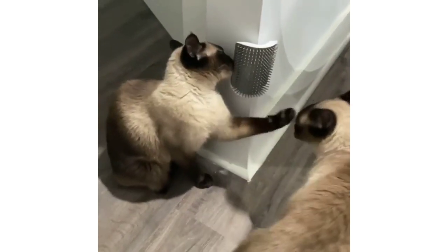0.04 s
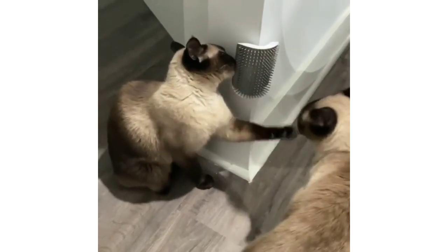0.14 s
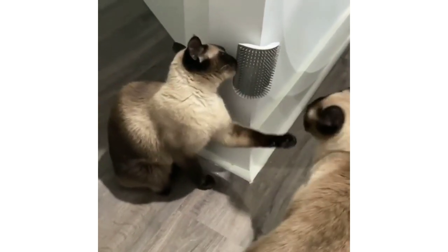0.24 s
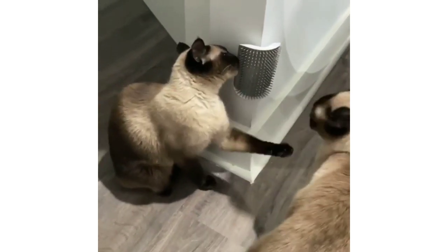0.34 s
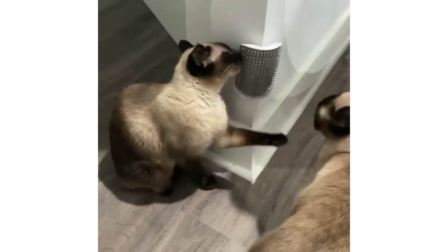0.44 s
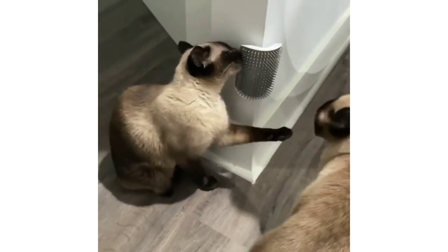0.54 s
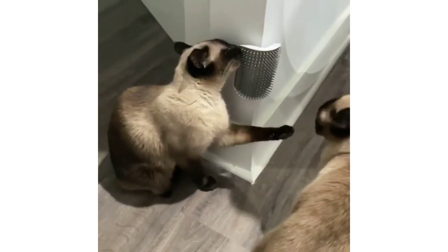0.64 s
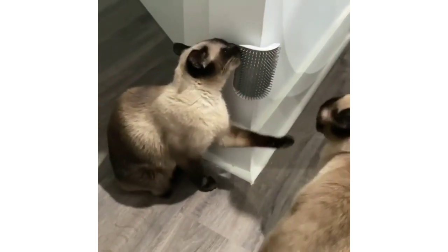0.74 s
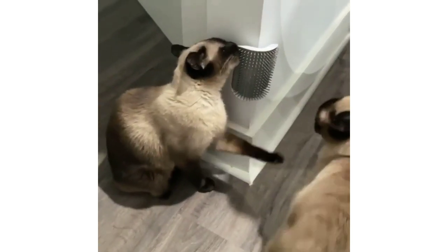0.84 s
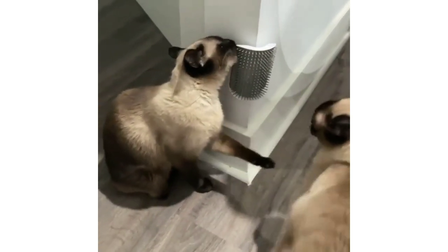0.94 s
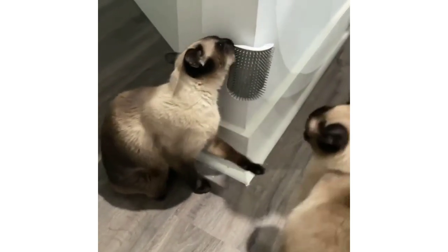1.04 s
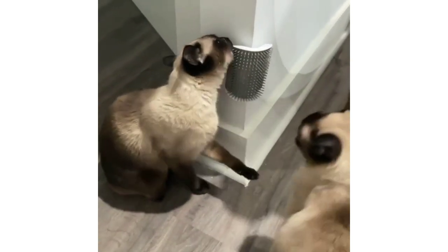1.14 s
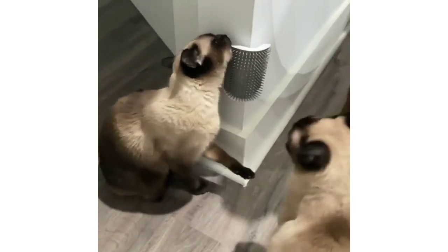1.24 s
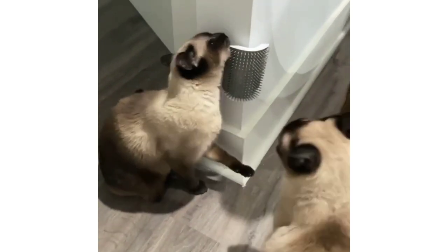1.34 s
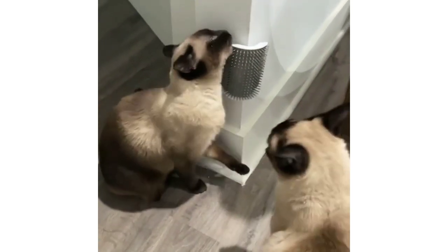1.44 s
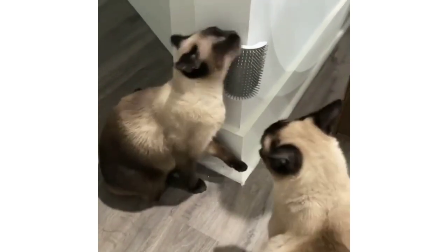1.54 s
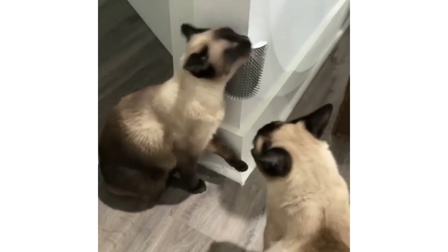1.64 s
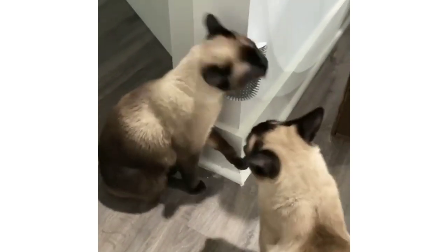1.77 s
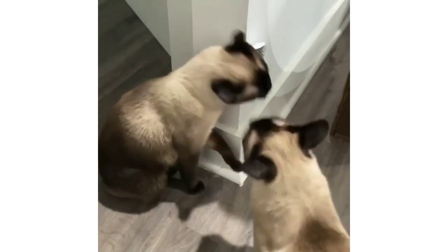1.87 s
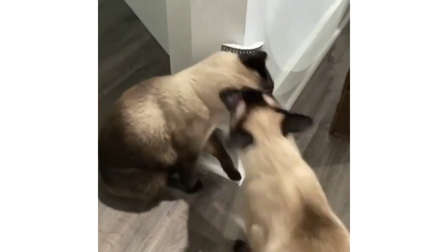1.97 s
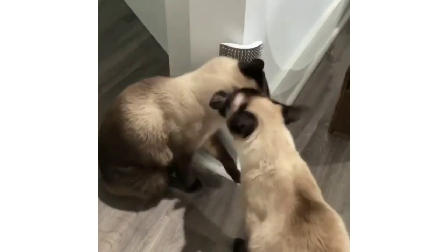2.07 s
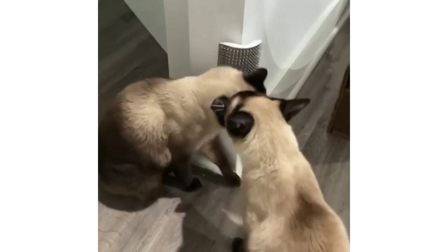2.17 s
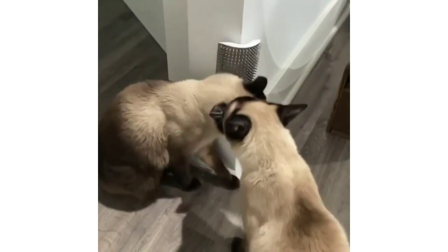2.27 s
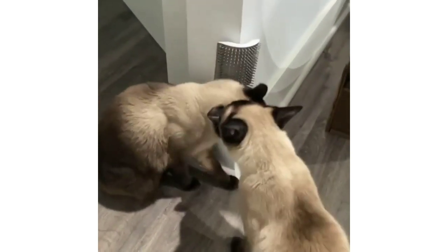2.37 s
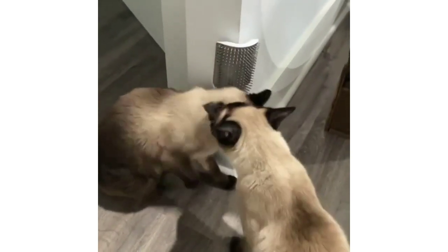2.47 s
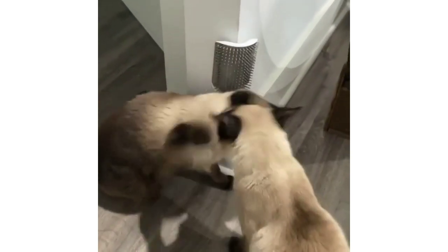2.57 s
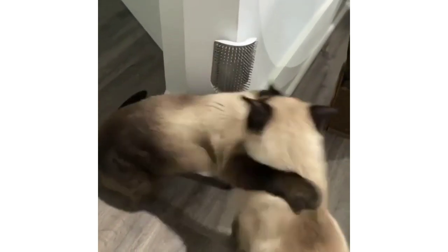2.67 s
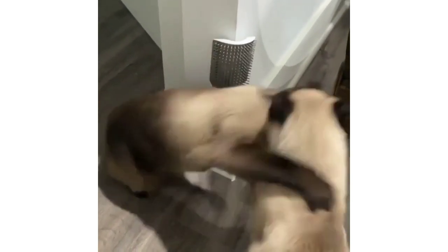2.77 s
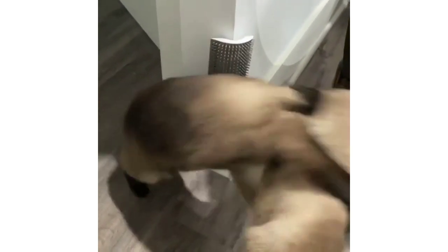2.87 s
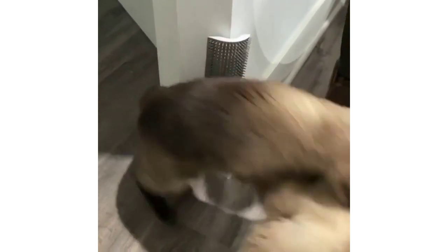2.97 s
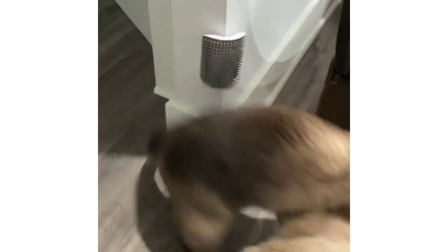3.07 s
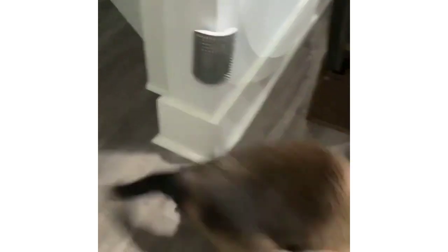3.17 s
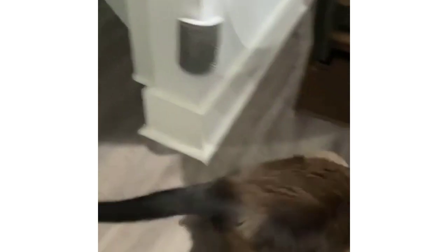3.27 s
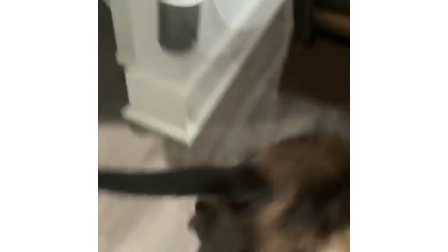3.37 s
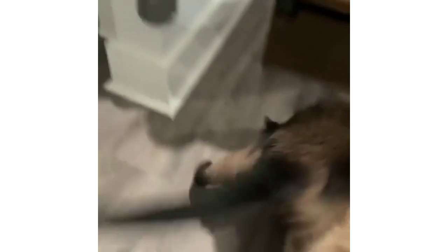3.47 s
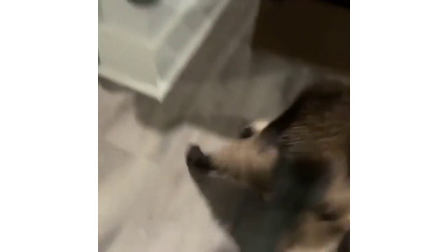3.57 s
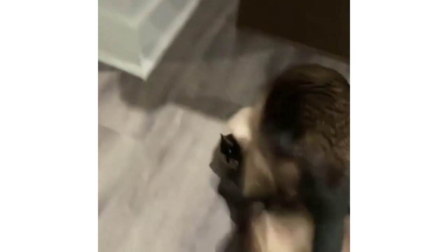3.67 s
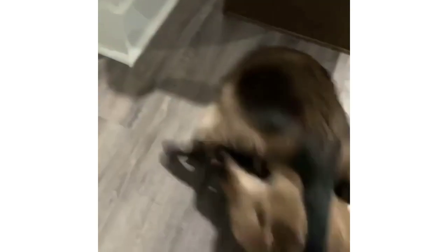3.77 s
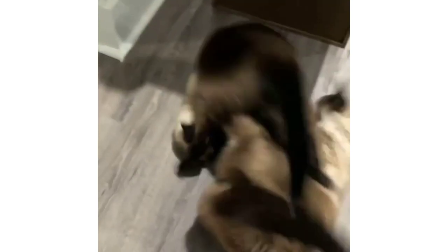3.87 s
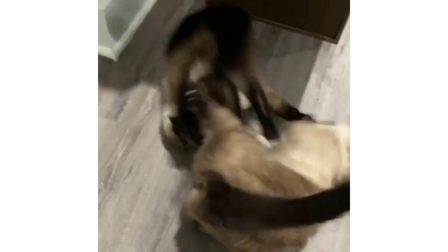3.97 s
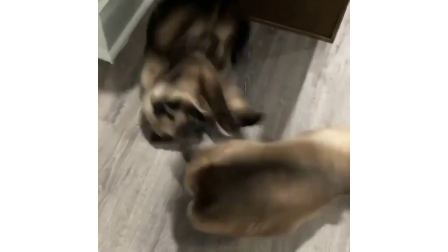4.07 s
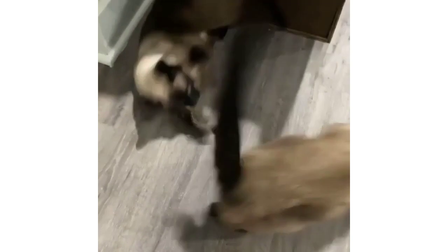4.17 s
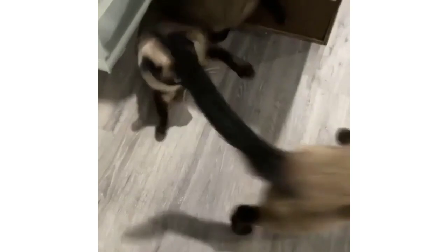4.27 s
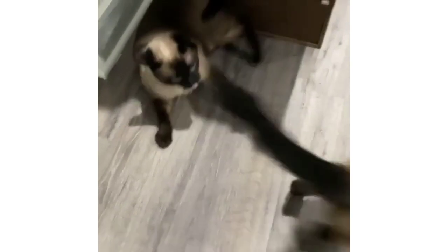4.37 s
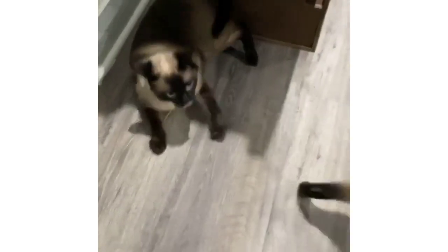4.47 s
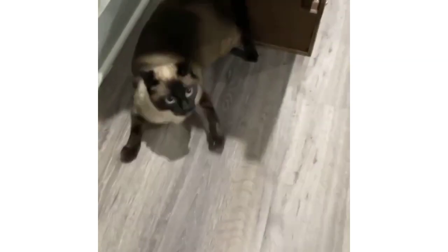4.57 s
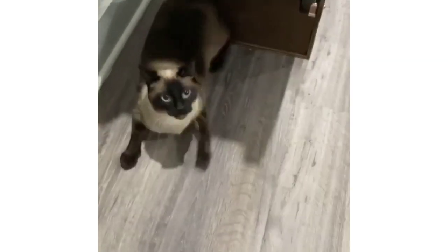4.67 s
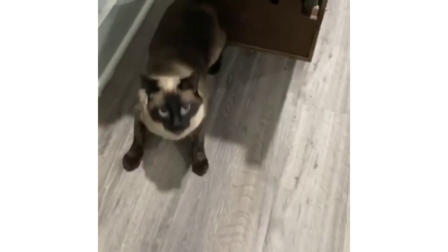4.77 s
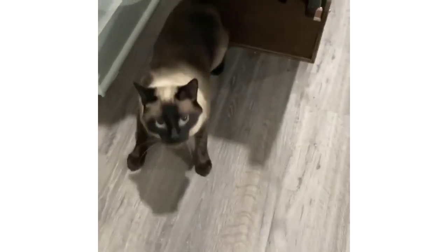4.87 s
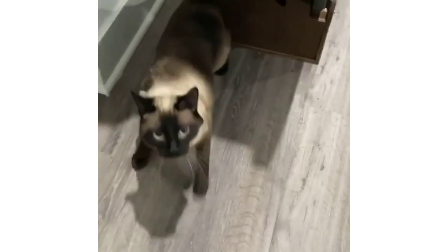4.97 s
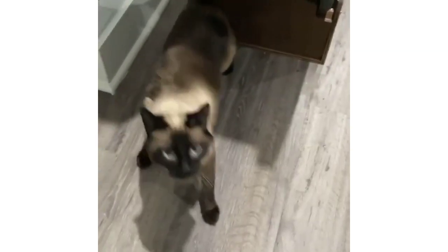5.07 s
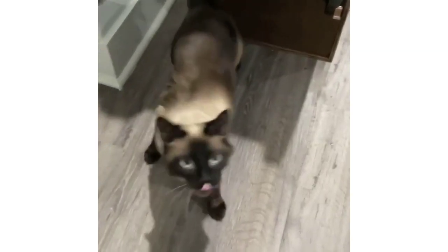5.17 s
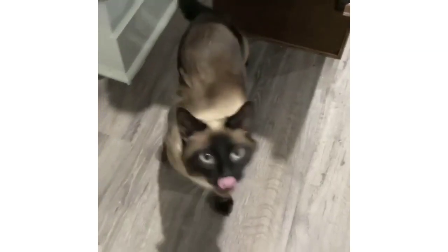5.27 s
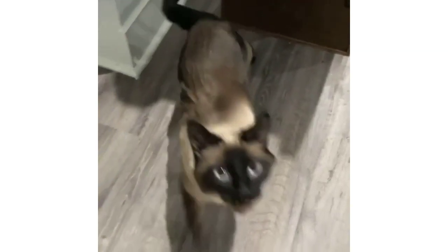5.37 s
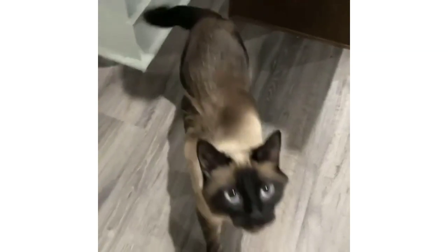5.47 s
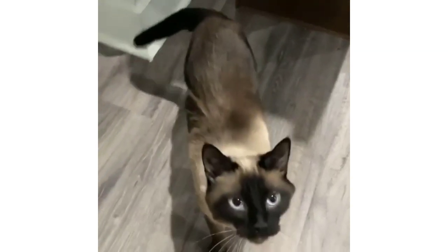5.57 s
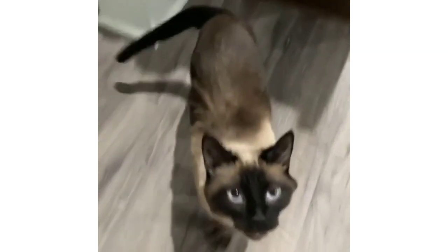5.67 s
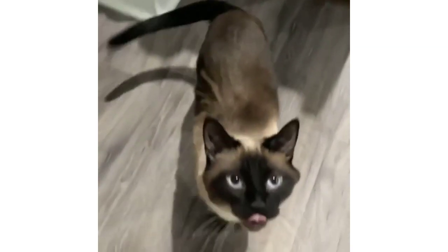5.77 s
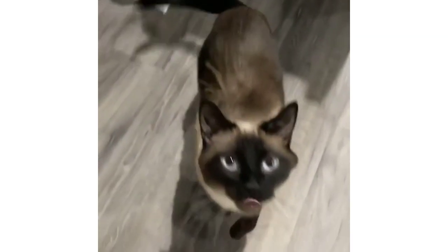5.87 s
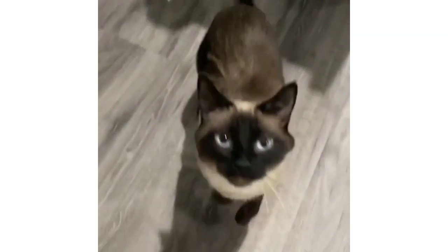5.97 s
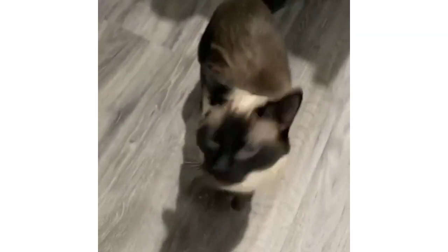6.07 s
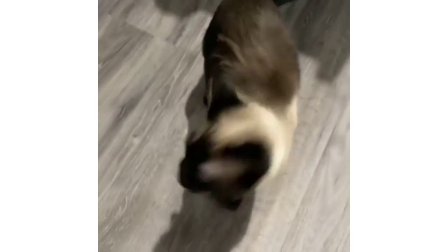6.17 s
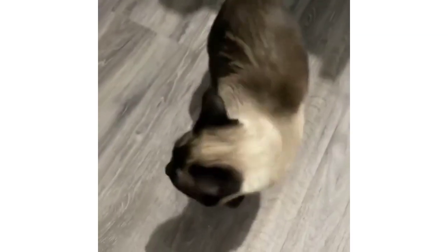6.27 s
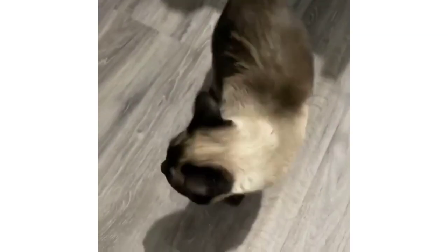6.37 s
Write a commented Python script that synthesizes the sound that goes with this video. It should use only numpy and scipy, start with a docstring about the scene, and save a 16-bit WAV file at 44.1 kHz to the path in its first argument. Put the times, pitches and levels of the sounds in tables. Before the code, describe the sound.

In a quiet room with low rumble, a few tiny claw ticks and fur swishes lead to a dry, raspy rub on a bristle brush. Two cats then wrestle on hard flooring: padded thuds, gritty skids, sharp claw clacks and fur rustles. Two hollow knocks on a wooden cabinet door are the loudest moment. A few scrambling steps fade to faint ticks. Close handheld phone pickup, short indoor echo.

```python
"""A faint house rumble comes first, soon joined by claw ticks and soft fur swishes from two cats.
One rubs its head on a bristle brush; then they wrestle on a laminate floor and knock a cabinet door twice.
Fur is uneven noise through resonances; ticks, skids and thuds are short coloured noise bursts,
and the wooden door is a set of ringing tones. Noise echoes make the room;
a phone hears it all through two close microphone ports."""
import sys
import numpy as np
from scipy import signal
from scipy.fft import rfft, irfft, next_fast_len
from scipy.io import wavfile

SR = 44100
rng = np.random.default_rng(int(sys.argv[2]) if len(sys.argv) > 2 else 0)


def output_pcm(signal):
    """Save a mono or channel-first signal as 16-bit PCM at the path in sys.argv[1].

    Samples are clipped to [-1, 1] before scaling.
    """
    pcm = np.clip(np.atleast_2d(signal).T, -1, 1) * 32767
    wavfile.write(sys.argv[1], SR, np.round(pcm).astype(np.int16))


N = 282668

# The head pushed along the bristles, as points in time:
# start_s, level_db, treble_db (treble compared with the level)
RUB = [(1.3, -82, -5.5), (1.44, -80, 1), (1.5, -74, -1), (1.57, -67.5, -9), (1.65, -65, -6.5),
       (1.75, -63.5, -9), (1.87, -60, -9), (2.07, -64.5, -9.5), (2.15, -66, -5), (2.37, -68.5, -5.5),
       (2.47, -67, -9.5), (2.6, -80.5, -13), (2.7, -100, -12)]

# The left port is a centimetre nearer, so it hears sound earlier (negative lag).
# The lag fades above LAG_FADE_HZ, as treble wraps round the case.
LEFT_LAG_S, LAG_FADE_HZ = -.000035, 3000


def from_db(db):
    """Turn decibels into a gain."""
    return 10 ** (np.asarray(db) / 20)


def rms_one(x):
    """Scale a sound to an average (rms) strength of 1."""
    return x / np.sqrt(np.mean(x ** 2) + 1e-20)


def at_hz(points, hz):
    """Read a table between its points, with pitch spaced by octaves."""
    table_hz, values = np.array(points).T
    return np.interp(np.log(hz), np.log(table_hz), values)


def band(x, low_hz, high_hz):
    """Keep only the pitches between two limits (Butterworth filter)."""
    sos = signal.butter(2, [low_hz, min(high_hz, .45 * SR)], "band", fs=SR, output="sos")
    return signal.sosfilt(sos, x)


def low_pass(x, cut_hz):
    """Gently soften everything above a pitch."""
    return signal.lfilter(*signal.butter(1, cut_hz, fs=SR), x)


def ring(x, hz, width_hz):
    """A resonance with two poles: a unit click rings at hz; a narrow width rings longer."""
    r, w = np.exp(-np.pi * width_hz / SR), 2 * np.pi * hz / SR
    return signal.lfilter([0, np.sin(w)], [1, -2 * r * np.cos(w), r * r], x)


def drift(rate_hz):
    """A slow random wander of spread 1; a higher rate wanders faster."""
    r = np.exp(-80 * np.pi * rate_hz / SR)  # computed at one point per 40 samples
    slow = signal.lfilter([1], [1, -2 * r, r * r], rng.standard_normal(N // 40 + 2002))
    slow = rms_one(slow[2000:])  # skip the filter's start
    return np.interp(np.arange(N) / 40, np.arange(len(slow)), slow)


def ports(mid, side):
    """Mix two unrelated signals into left and right, as alike as the ports are at each pitch."""
    # How alike the ports hear sound from all around: pitch_hz, likeness (-1 opposite to 1 same)
    likeness = [(60, 0.97), (125, 0.9), (250, 0.81), (1000, 0.0063), (3000, 0.36), (6000, 0.098),
                (8700, -0.58), (10300, -0.38), (12000, 0.28)]
    size = next_fast_len(N)
    hz = np.fft.rfftfreq(size, 1 / SR)
    alike = np.clip(at_hz(likeness, np.maximum(hz, 1)), -1, 1)
    mid = rfft(mid, size) * np.sqrt(1 + alike)
    side = rfft(side, size) * np.sqrt(1 - alike)
    lag_s = LEFT_LAG_S / (1 + (hz / LAG_FADE_HZ) ** 2)
    left = (mid + side) * np.exp(-2j * np.pi * hz * lag_s)
    return irfft(np.array([left, mid - side]), size)[:, :N]


def add(out, sound, s):
    """Mix a short sound in at a time in seconds."""
    i = round(s * SR)
    out[..., i:i + sound.shape[-1]] += sound[..., :N - i]


def house():
    """Steady rumble and hiss: noise in third-octave bands, each wavering a little in level."""
    # Colour of the house noise: pitch_hz, density_db (relative, per Hz)
    house_colour = [(12, -53), (20, -33.5), (41, -5.5), (66, -2.5), (124, -5.5), (146, -15.5), (252, -15),
                    (281, -18.5), (513, -25.5), (837, -38.5), (2170, -46), (6830, -56.5), (8040, -55.5),
                    (12400, -61), (13500, -65)]
    out = 0
    edges_hz = 20 * 2 ** np.arange(0, 9.7, 1 / 3)
    white = rng.standard_normal((2, 2, N))
    for k, (low, high) in enumerate(zip(edges_hz, edges_hz[1:])):
        level_db = at_hz(house_colour, np.sqrt(low * high)) + 1.6 * drift(5)
        out = out + from_db(level_db) * band(white[k % 2], low, high)
    return from_db(-57) * rms_one(ports(*out))


def room(x):
    """Echoes as fading noise, different at the two ports; treble fades twice as fast."""
    t60_s, room_db, wall_cut_hz = 0.56, -8, 1630  # t60: time to fade by 60 dB
    t = np.arange(30000) / SR
    fade = from_db(-60 * t / t60_s)
    echoes = rng.standard_normal((2, len(t))) * np.clip(t / 0.009, 0, 1) * fade
    dull = low_pass(echoes, wall_cut_hz)
    echoes = dull + (echoes - dull) * fade
    echoes = signal.sosfilt(signal.butter(2, 140, "high", fs=SR, output="sos"), echoes)
    # Scale by the energy of the dull part
    echoes /= np.sqrt(np.sum(dull[0] ** 2) * SR / 2 / wall_cut_hz / 1.52)
    mid, side = signal.fftconvolve(echoes, x[None], axes=1)[:, :N]
    return from_db(room_db) * (mid + band(side, 220, 16000) * [[1], [-1]])


def fur_levels(t):
    """Gains of the fur's body and treble: stirring, rub and swishes add up in power."""
    # Short swishes of fur, on the bristles at first and later on the floor:
    # peak_s, peak_db, swell_s and fade_s (time per 20 dB, treated as at least 0.005 s),
    # treble_db (compared with the body)
    swishes = [(0.45, -85.5, 0.33, 0.3, 2), (0.615, -78, 0.32, 0.15, -24), (0.72, -82, -0.7, 0.14, -20),
               (0.82, -74.5, 0.02, 0.4, -3), (0.948, -73.5, 0.02, 0.3, -13.5),
               (1.05, -68.5, 0.01, 0.08, -2), (1.129, -72.5, 0.06, 0, -12), (1.188, -66.5, 0.04, 0.07, -6),
               (2.8, -74, 0.14, 0.25, -4), (3.001, -60, 0, 0.12, -17), (3.088, -61.5, 0.06, 0.13, -9.5),
               (3.164, -70.5, 0.01, 0.05, 11.5), (3.215, -71, 0.08, 0.04, 9.5),
               (3.246, -53, 0.005, 0.16, -15), (3.329, -60.5, 0.22, 0.17, -3.5),
               (3.443, -71.5, -0.05, -0.05, 8.5), (3.547, -76, -0.8, -1.5, -10),
               (3.709, -56.5, 0.17, 0.35, -5), (3.79, -85, 0.2, -7, 1), (3.863, -52, -0.1251, 0.0536, -7.5),
               (3.919, -55.5, 0.07, 0.21, -31), (3.988, -71, -0.26, 0.16, 7), (4.116, -66.5, 0, 0.14, -1),
               (4.3, -71.5, 1.9, 0.01, -25), (4.367, -56, 0.05, -0.0156, -9), (4.42, -77.5, -1.8, 0.25, 5),
               (4.493, -60, 0.07, 0.0435, -7.5), (4.57, -81, 0, 0.2, -5), (4.596, -65, 0.1, -0.02, -10),
               (4.612, -60.5, 0.1, 0.0053, -22), (4.65, -70, 0.7, 0.09, -13), (4.72, -83, 0.03, 0.12, 8),
               (4.829, -90.5, -0.4, 0.5, 8), (5.16, -88.5, 0.55, 0.1, 2.5), (5.285, -84, 0.4, 0, -13),
               (5.701, -84.5, 0.2, 0.4, -20.5), (6.12, -84.5, 0.34, 0.27, -2.5)]
    stir_db, stir_treble_db = -93, -0.5  # faint steady stirring; treble compared with it
    rub_s, rub_db, rub_treble_db = np.transpose(RUB)
    rub_db = np.interp(t, rub_s, rub_db, left=-200, right=-200)
    rub_treble_db = np.interp(t, rub_s, rub_treble_db)
    # Doubled decibels give power
    body = from_db(2 * stir_db) + from_db(2 * rub_db)
    treble = from_db(2 * (stir_db + stir_treble_db)) + from_db(2 * (rub_db + rub_treble_db))
    for s, db, swell_s, fade_s, treble_db in swishes:
        before, after = (s - t) / max(swell_s, .005), (t - s) / max(fade_s, .005)
        power = from_db(2 * (db - 20 * np.where(t < s, before, after)))
        body = body + power
        treble = treble + power * from_db(2 * treble_db)
    return np.sqrt(body), np.sqrt(treble)


def resonate(grains, hz, width_hz, db, waver_db):
    """Grains through one resonance whose level wavers."""
    return from_db(db + waver_db * drift(13.0)) * rms_one(ring(grains, hz, width_hz))


def fur():
    """Countless hairs slip: uneven noise grains excite resonances, with fine sizzle and claw grit."""
    # Bristle resonances: pitch_hz, width_hz, level_db, gain (extra dB per dB of rub)
    bristles = [(915, 150, -4, 1), (1084, 73, -3, 0.3), (1285, 108.5, -2.5, -0.1), (1720, 297, -4, 0.6),
                (2042, 260, -1, 0.02), (2600, 400, -0.5, 0.06), (3280, 220, -4, 0.3),
                (3700, 430, -4.5, 0.05), (4550, 1800, -4.5, -0.04), (6800, 4100, -11, -0.2)]
    # Resonances of fur and pads on the floor: pitch_hz, width_hz, level_db
    floor_tones = [(620, 500, -4), (960, 700, 5), (1440, 370, 1.5), (1615, 140, -1), (2000, 500, 0),
                   (2660, 680, -1.5), (3400, 660, -2.5), (4400, 1800, -4), (6300, 1800, -9)]
    wrestle_s = 2.62  # the cats leave the brush for the floor
    firm_rub_db = -65  # rub level at which the bristles have their listed strength
    t = np.arange(N) / SR
    body_gain, treble_gain = fur_levels(t)
    wrestling = t > wrestle_s
    grain_db = 2.2 * rng.standard_normal(N) + np.where(wrestling, 2.2, 1.1) * drift(40)
    grains = rms_one(rng.standard_normal((2, N)) * from_db(grain_db))
    # Grit under the claws: about 260 random clicks a second while wrestling
    clicks = rng.random(N) < 260 / SR
    scratches = clicks * from_db(10.5 + 3.2 * rng.standard_normal(N)) * wrestling
    grains = grains + scratches * [[1], [.6]]

    rub_s, rub_db, _ = np.transpose(RUB)
    press_db = np.interp(t, rub_s, rub_db).clip(-72, 0) - firm_rub_db
    brush, floor = 0, 0
    # Every other resonance is turned upside down
    for k, (hz, width_hz, db, gain) in enumerate(bristles):
        brush = brush + resonate(grains, hz, width_hz, db + gain * press_db, waver_db=1.0) * (-1) ** k
    for k, (hz, width_hz, db) in enumerate(floor_tones):
        floor = floor + resonate(grains, hz, width_hz, db, waver_db=2.56) * (-1) ** k
    body = np.where(wrestling, from_db(3.5) * rms_one(floor), rms_one(brush))
    body = rms_one(band(body, 540, 9000))

    # The sizzle swaps the two grain signals
    sizzle = rms_one(signal.lfilter(*signal.butter(1, 6000, "high", fs=SR), grains[::-1]))
    treble = from_db(1.8 * drift(6.4) + 2.3 * drift(30) * wrestling) * sizzle
    return ports(*(body_gain * body + treble_gain * treble))


def contact(noise, hz, octaves, rise_s, length_s):
    """One touch: grit swells to a snap and dies away, coloured around its centre; peak 1."""
    grit_power = .6  # how uneven the grains are
    snap, snap_s = 7.0, .008  # snap height for a touch of this length; shorter ones snap harder
    t = np.arange(len(noise)) / SR
    swell = (t / max(rise_s, .0001)).clip(0, 1)
    fade = np.exp(-(t - rise_s).clip(0) / max(length_s, .0002))
    grit = noise * np.abs(noise[::-1]) ** grit_power * swell * fade
    grit[round(max(rise_s, 0) * SR)] += snap * np.sqrt(snap_s / max(length_s, .001))
    spread = 2 ** max(octaves, .05)
    low_hz, high_hz = hz / spread, hz * spread
    touch = band(band(grit, low_hz, high_hz), low_hz / 1.6, high_hz * 1.6)
    return touch / np.abs(touch).max()


def soft_thuds():
    """Padded feet, flanks and the settling door give dull, short thuds of filtered noise."""
    # Soft thuds: start_s, peak_db, pitch_hz (centre), length_s (fade of the push)
    thuds = [(0.574, -51, 237, 0.0039), (1.609, -54, 363, 0.008), (2.111, -47, 122, 0.01),
             (2.676, -46, 209, 0.013), (2.926, -41.5, 346, 0.028), (2.95, -44.5, 145, 0.025),
             (2.994, -47.5, 150, 0.055), (3.076, -40, 238, 0.0074), (3.105, -42.5, 193, 0.0038),
             (3.195, -30.5, 430, 0.014), (3.216, -35.5, 172, 0.01), (3.238, -29.5, 323, 0.0026),
             (3.298, -42, 325, 0.0058), (3.192, -34.5, 128, 0.019), (3.433, -45, 153, 0.008),
             (3.485, -42.5, 168, 0.0078), (3.577, -43.5, 172, 0.0073), (3.654, -45, 520, 0.01),
             (3.67, -37.5, 530, 0.017), (3.693, -46.5, 480, 0.008), (3.702, -37.5, 387, 0.0067),
             (3.713, -44.5, 440, 0.0019), (3.746, -48.5, 484, 0.0035), (3.793, -45.5, 192, 0.05),
             (3.814, -41.5, 163, 0.013), (4.279, -43, 355, 0.013), (4.297, -33.5, 188, 0.013),
             (4.385, -42.5, 190, 0.039), (4.44, -49, 301, 0.011), (4.468, -44.5, 221, 0.0091),
             (4.647, -46, 175, 0.053), (4.986, -47.5, 190.4, 0.0077)]
    out, noise = np.zeros(N), rng.standard_normal((len(thuds), 7000))
    for (s, db, hz, length_s), grit in zip(thuds, noise):
        add(out, from_db(db) * contact(grit, hz, 0.59, 0.00359, length_s), s)
    return out


def ticks_and_skids():
    """Claws, pads, a rattling door and late brushes: coloured grit plus a crack around 7 kHz."""
    # Short touches: snap_s, level_db (main colour's peak), pitch_hz (centre), width_octaves (each way),
    # length_s (fade of the touch), crack_db (compared with the main colour)
    touches = [(0.439, -61, 1210, 1.3, 0.005, -4), (0.45, -70, 3650, .15, 0.01, -13),
               (0.528, -67.5, 3070, 0.16, 0.0043, -14), (0.59, -67, 1310, 0.31, 0.018, -14),
               (1.048, -61.5, 1190, 0.71, 0.021, -17), (1.185, -69.5, 2790, 0.16, 0.02, -13),
               (1.483, -59, 1930, 0.76, 0.02, -14), (1.986, -45, 1910, 0.46, 0.00051, -11),
               (2.039, -51, 1010, 0.73, 0.0023, -19), (2.672, -44.5, 628, 1.25, 0.0034, -22),
               (2.781, -55.5, 3430, 0.75, 0.0036, -1), (2.798, -53, 2580, 0.65, 0.011, -14.5),
               (2.923, -57, 890, 0.61, 0.0096, -23), (2.992, -47, 1800, 1, 0.008, -11),
               (2.995, -52, 2410, 0.16, 0.008, -18), (3.05, -53, 1340, 0.093, 0.018, -34),
               (3.069, -38.5, 556, 0.21, 0.0021, -22), (3.081, -55, 1850, 0.18, 0.0015, -16),
               (3.197, -29.5, 490, 0.6, 0.0024, -43), (3.2004, -21.5, 875, .32, 0.0026, -38),
               (3.209, -37.5, 1016, 0.93, 0.02, -23), (3.253, -40, 796, 1.3, 0.015, -18.5),
               (3.24, -24.5, 748, 1.56, 0.0032, -9.5), (3.537, -51.5, 730, 0.38, 0.0056, -5),
               (3.662, -44.5, 1424, 0.99, 0.0053, -10.5), (3.672, -52, 1200, 0.92, 0.0035, -9),
               (3.689, -44, 1000, 0.98, 0.0011, -16.5), (3.716, -41, 1550, 1.1, 0.0015, 4.5),
               (3.859, -31.5, 2000, 0.28, 0.007, -29.5), (3.86, -42.5, 4000, 0.37, .006, -19),
               (3.864, -35, 1502, 0.5, 0.0036, -23.5), (3.869, -36, 2200, 0.31, 0.0043, -23.5),
               (3.887, -50, 3200, 0.56, .004, -15), (3.932, -53.5, 2490, 0.27, .006, -22),
               (3.88, -43.5, 2200, 0.62, .006, -11.5), (3.903, -25.5, 896, 0.35, 0.0024, -31),
               (3.9033, -22.5, 1430, 0.2, 0.0019, -31.5), (3.904, -37, 2400, 0.082, 0.0044, -20.5),
               (3.902, -41, 3380, 0.14, 0.0015, -19.5), (3.914, -40.5, 1480, 0.26, .006, -31.5),
               (3.918, -47.5, 3300, 0.15, 0.0032, -20), (3.944, -47, 1450, 0.16, .004, -29.5),
               (4.006, -49.5, 1500, 0.2, .003, -30), (4.009, -47.5, 1650, 0.14, 0.0053, -30),
               (3.954, -44, 1520, 0.16, 0.0099, -27.5), (3.9617, -26.5, 1393, 0.45, 0.0022, -35.5),
               (3.978, -48, 1880, 0.13, 0.0015, -30), (4.116, -40.5, 700, 1.0, 0.0038, -6.5),
               (4.22, -38, 3220, 0.31, 0.0016, -22.5), (4.226, -43.5, 2400, 0.15, 0.034, -42),
               (4.362, -58, 4700, 0.16, 0.001, -13), (4.369, -43.5, 2470, 0.16, 0.0021, -4.5),
               (4.368, -48, 4800, 0.19, 0.0032, -11), (4.564, -59, 3480, 0.19, 0.034, -8),
               (4.595, -47, 3280, 0.49, 0.015, -20), (4.674, -59, 7300, 0.37, 0.0024, -7),
               (4.988, -57, 560, 0.52, 0.004, -25), (5.158, -71.5, 4200, 0.33, 0.021, -9.5),
               (5.282, -67, 2040, 0.38, 0.009, -13), (5.438, -64, 806, 0.8, 0.0024, -19.5),
               (5.692, -61, 1884, 0.63, 0.0088, -11), (5.929, -71.5, 2100, 0.081, 0.012, -32),
               (6.04, -74.5, 2300, 0.15, 0.008, -31), (6.378, -64, 900, 0.71, 0.0027, -14)]
    out, noise = np.zeros(N), rng.standard_normal((len(touches), 4000))
    for (s, db, hz, octaves, length_s, crack_db), grit in zip(touches, noise):
        rise_s = .2 * length_s + 1.2 / hz  # a share of the length plus some cycles of its colour
        main = contact(grit, hz, octaves, rise_s, length_s)
        crack = contact(grit, 7000, 1.0, rise_s, length_s)
        add(out, from_db(db) * (main + from_db(crack_db) * crack), s - rise_s)
    return out


def door_mode(push, hz, t60_s, k):
    """One panel tone swells under the soft push and dies unevenly; low ones start sharp and settle."""
    panel_hz, swell_cycles, uneven_db = 200, 0.763, 3  # tones below panel_hz swing together
    sag_share, sag_s = .3, 0.016  # the struck panel is taut at first: starting sharpness, settling time
    t = np.arange(len(push)) / SR
    mode = ring(push, hz, np.log(1000) / np.pi / t60_s)
    if hz < panel_hz:
        # Reading ahead ever more slowly makes the pitch fall
        mode = np.interp(t + sag_share * sag_s * (1 - np.exp(-t / sag_s)), t, mode)
    else:
        mode = mode * (-1) ** k
    swell = 1 - np.exp(-t * hz / swell_cycles)
    return mode * swell * from_db(uneven_db * drift(44)[:len(t)])


def door():
    """A padded knock rings all panel tones, weighted by the spot; its first cycles fill the room."""
    # Knocks on the cabinet door: start_s, peak_db
    door_knocks = [(4.1435, -19), (4.2205, -13)]
    # Panel tones: pitch_hz, t60_s (fade by 60 dB), low_db (struck low), edge_db (struck near the edge)
    panel_tones = [(112, 0.23, -14, -12.5), (149.5, 0.16, 0, 0.5), (189.6, 0.45, -17, -15.5),
                   (245, 0.14, -14, -4.5), (358.5, 0.062, -12.5, -1.5), (397, 0.064, -29, -18),
                   (427, 0.11, -12, -17.5), (568, 0.025, -7, -1), (709, 0.074, -10, -13),
                   (869, 0.031, -7.5, -9.5), (945.7, 0.093, -15.5, -3), (952, 0.07, -9, -14),
                   (1130, 0.01, -2.5, -15.5), (1450, 0.025, -13.5, -9.5)]
    contact_s, burst_s, burst_db = 0.0005, .011, 2  # burst: the loud first cycles sent to the room
    damped_s, damping_db_per_s, damping_db = 0.1, 400.5, 7  # a flank then rests on the panel
    out, t = np.zeros((2, N)), np.arange(16000) / SR
    push = np.exp(-((t / contact_s - 1.5) ** 2) * 4)
    damping = from_db(-(damping_db_per_s * (t - damped_s)).clip(0, damping_db))
    burst = from_db(burst_db) * np.exp(-t / burst_s)
    for spot, (s, db) in enumerate(door_knocks):
        sound = 0
        for k, (hz, t60_s, *spot_db) in enumerate(panel_tones):
            sound = sound + from_db(spot_db[spot]) * door_mode(push, hz, t60_s, k)
        sound = band(sound * damping, 92, 9000)
        sound = from_db(db) * sound / np.abs(sound).max()
        add(out, sound * np.array([np.ones_like(t), burst]), s)
    return out


def scene():
    """House, room echoes, fur, short touches, thuds and door knocks at the two ports."""
    touches = soft_thuds() + ticks_and_skids()
    knocks, bursts = door()
    hits = touches + knocks
    # A near wall adds one distinct echo, 14.5 ms later and stronger on the left
    echo = np.roll(band(hits, 430, 3400), round(.0145 * SR))
    wall = from_db(-12) * echo * [[1.3], [.6]]
    low = low_pass(hits, LAG_FADE_HZ)
    left = hits - low + np.roll(low, round(LEFT_LAG_S * SR))
    right = hits - 2 * band(hits, 7600, 10500)  # the ports hear this band in opposite phase
    return np.array([left, right]) + wall + room(touches + bursts) + fur() + house()


def record(dry):
    """A steep filter removes the top, above about 13.1 kHz."""
    return signal.sosfilt(signal.ellip(12, .5, 60, 13300 * .985, fs=SR, output="sos"), dry)


dry = scene()
out = record(dry)
output_pcm(out)
```